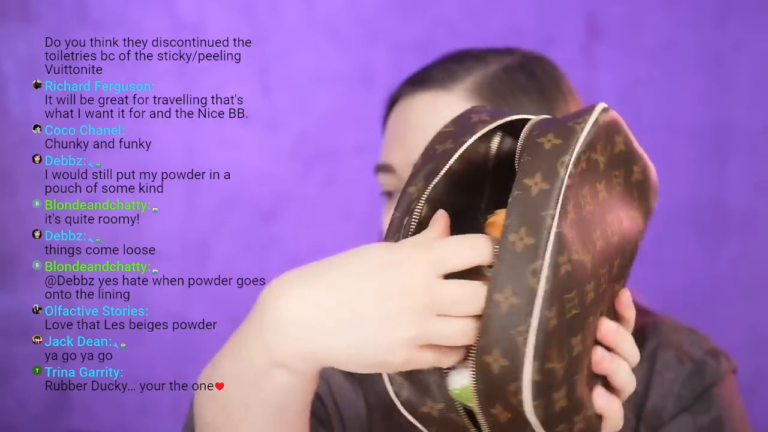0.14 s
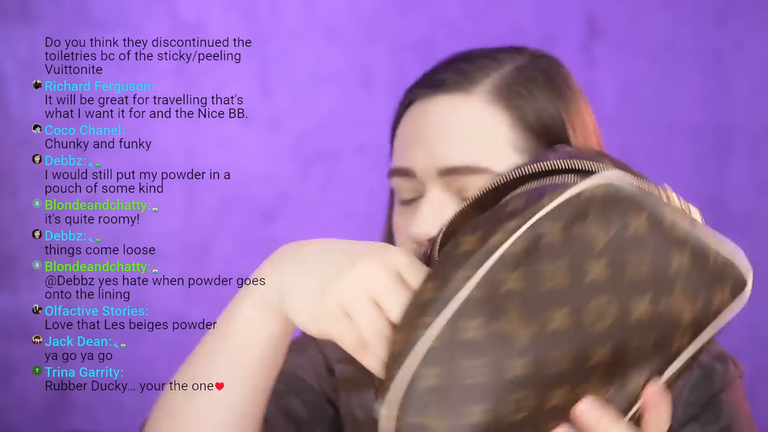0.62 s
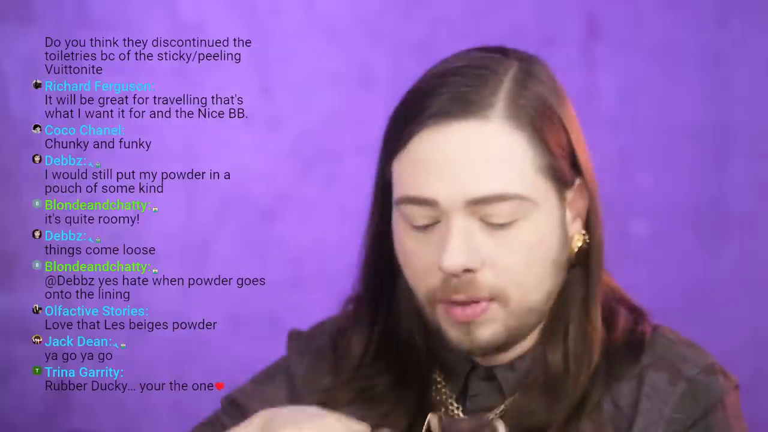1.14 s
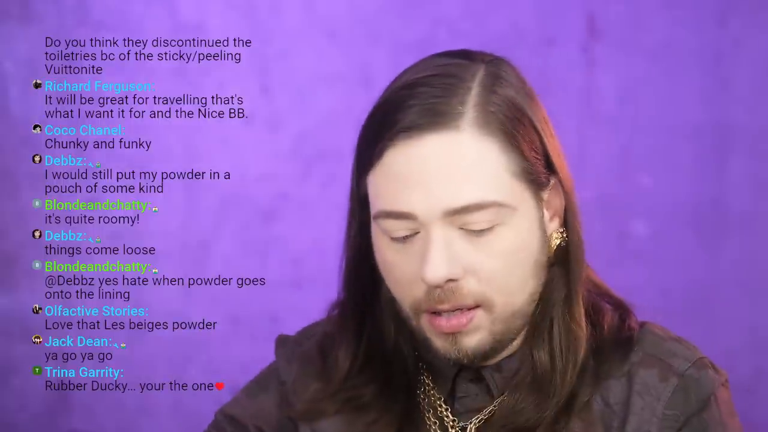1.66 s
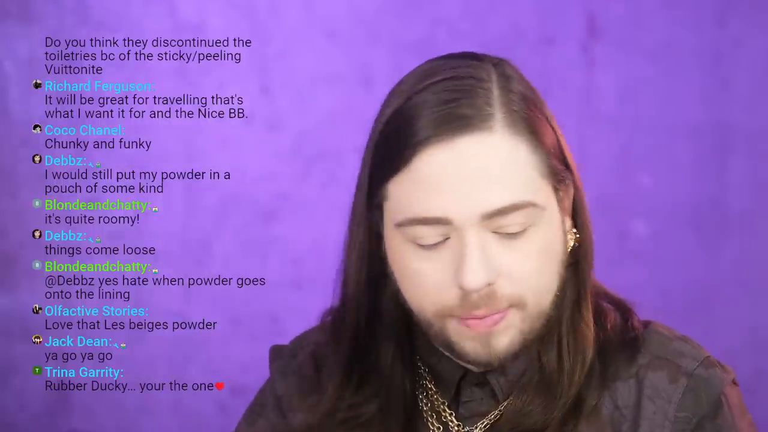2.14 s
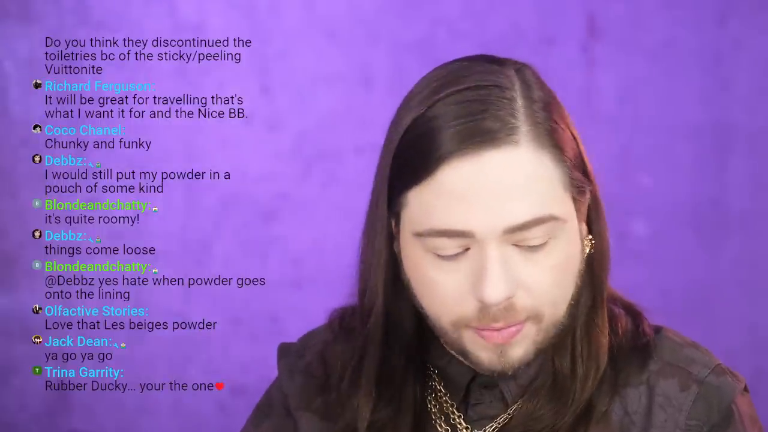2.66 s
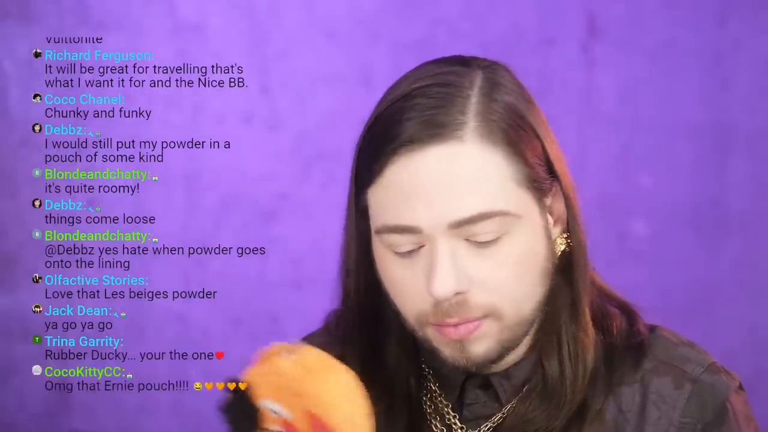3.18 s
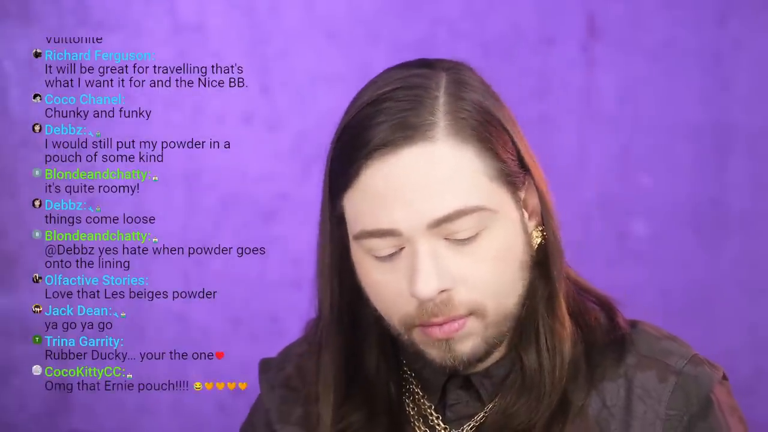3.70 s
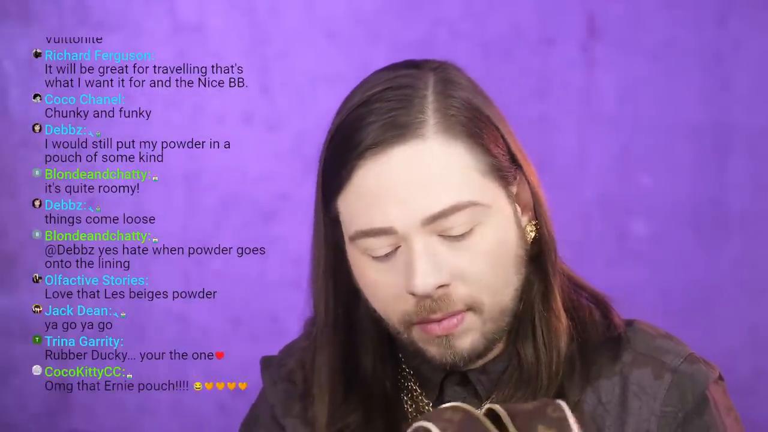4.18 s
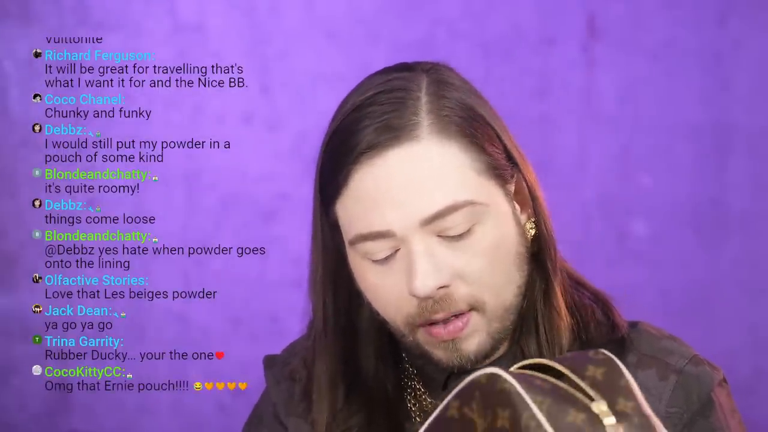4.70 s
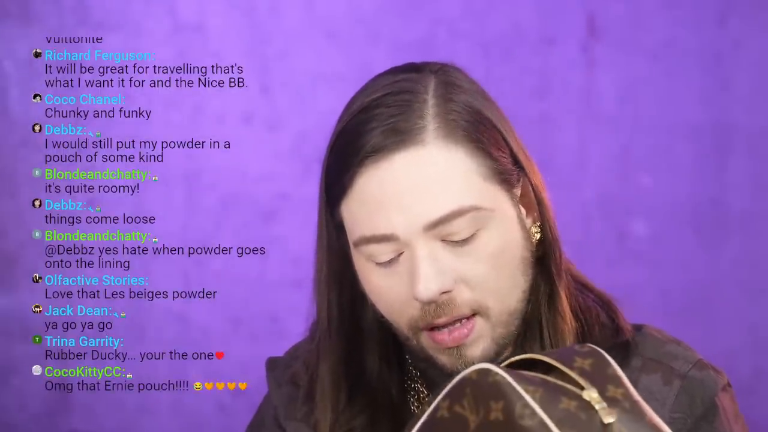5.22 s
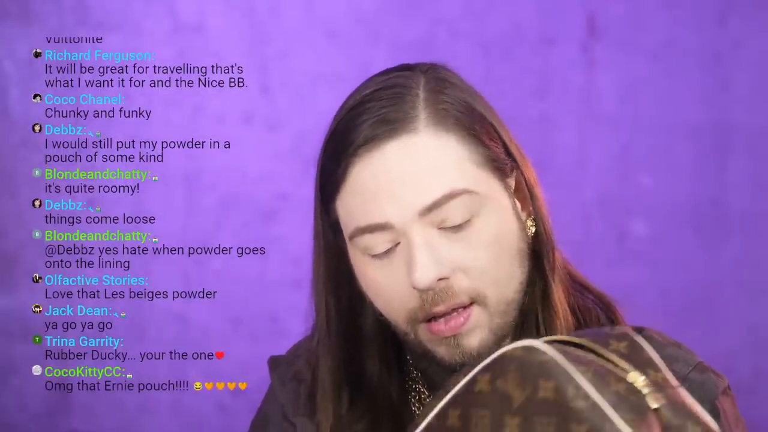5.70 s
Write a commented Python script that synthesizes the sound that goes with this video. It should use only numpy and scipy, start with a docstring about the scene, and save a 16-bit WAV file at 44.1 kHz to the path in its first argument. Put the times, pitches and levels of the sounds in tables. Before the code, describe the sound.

Small things shift in a coated canvas pouch with sharp crinkly snaps, then a soft knock on a table and lighter rustling over low hum.

```python
"""Mains hum and hiss lie under the whole scene, summed from harmonics and filtered noise; they sink around 2 s.
From the start a hand moves small things in a coated canvas pouch: grains of noise make crinkle and cloth rub,
lumpy low noise the rumble of the contents. From 0.13 s creases snap and thump as damped sines with noise
bursts, densest before 2 s. Near 3.8 s one thing is set down on a table with a soft modal knock, then a thin
filtered-noise hiss as of sliding; handling returns from 4.1 to 4.8 s and from 5.4 s."""
import sys
import numpy as np
from scipy import signal
from scipy.fft import rfft, irfft, next_fast_len
from scipy.io import wavfile
from scipy.ndimage import map_coordinates

SR = 44100
rng = np.random.default_rng(int(sys.argv[2]) if len(sys.argv) > 2 else 0)


def log_audio(samples):
    """Write samples as a 16-bit WAV file to the path given in sys.argv[1]."""
    # one column per channel
    frames = np.atleast_2d(samples).T
    # limit to full scale, then quantise
    limited = np.clip(frames, -1, 1)
    pcm = np.round(limited * 32767).astype(np.int16)
    wavfile.write(sys.argv[1], SR, pcm)


def attenuation_scalar(level_db):
    """Turn a level in dB into a linear amplitude multiplier (20 dB per decade)."""
    decades = np.asarray(level_db, float) / 20
    return 10 ** decades


N = 257229

# Level of hum and hiss together: time_s, level_db
BACKGROUND_LEVEL = [(0.0, -51), (.6, -50.5), (1.8, -52.5), (2.5, -57.5), (3.3, -56.5), (5.83, -56.5)]
# Harmonics of the mains: multiple (of MAINS_HZ), relative_level_db
HUM_HARMONICS = [(1, 0), (2, -23), (3, -18.5), (5, -26)]
MAINS_HZ = 50
# Spectrum of the steady hiss: frequency_hz, relative_level_db
HISS_SPECTRUM = [(20, 11.5), (50, 0.5), (80, 2), (150, -7.5), (300, -9.5), (600, -14.5), (1200, -16.5),
                 (2500, -20.5), (5000, -22), (9000, -27.5), (15800, -27.5), (16300, -53)]

# Slow movement of the pouch: time_s, crinkle_level_db, rub_level_db
SLOW_MOVEMENT = [(0, -71.5, -69.5), (.3, -63, -63.5), (.42, -71, -67), (.62, -64, -63.5), (1.1, -64.5, -63),
                 (1.75, -67.5, -62.5), (1.88, -70, -70.5), (2.2, -71.5, -67.5), (2.6, -76, -70),
                 (3.15, -77, -74), (3.7, -74.5, -73.5), (3.95, -81, -79.5), (4.15, -70.5, -73),
                 (4.45, -69.5, -67.5), (4.68, -74, -73), (4.8, -72, -72), (4.9, -83.5, -79),
                 (5.36, -92.5, -80), (5.45, -72, -64.5), (5.6, -73.5, -72), (5.73, -77, -77.5),
                 (5.83, -67, -66)]
SLOW_FIZZ_DB = -13  # fizz of the slow movement, relative to its crinkle
# The hand presses the pouch: start_s, hold_s (from the start), crinkle_level_db, rub_level_db, fizz_level_db
SQUEEZES = [(0.121, 0.038, -62.5, -61.5, -68), (0.214, 0.043, -54, -54.5, -65),
            (0.329, 0.018, -57.5, -65, -69.5), (0.491, 0.032, -59, -66.5, -74),
            (1.145, 0.03, -40.5, -55, -55), (1.191, 0.061, -55, -58.5, -66),
            (1.278, 0.024, -59.5, -58.5, -76.5), (1.371, 0.051, -52.5, -53.5, -67),
            (1.445, 0.02, -58.5, -55.5, -60), (1.521, 0.03, -60, -55, -71),
            (1.58, 0.064, -59.5, -68.5, -77), (1.693, 0.045, -55.5, -56.5, -68),
            (2.018, 0.059, -67, -73.5, -79), (2.303, 0.035, -67, -63.5, -83.5),
            (2.442, 0.057, -78.5, -69, -82), (2.779, 0.034, -71.5, -64.5, -95.5),
            (2.995, 0.065, -73.5, -72, -85), (3.614, 0.12, -74, -77, -81), (3.756, .025, -68, -63, -80),
            (3.79, 0.033, -54, -50, -70), (4.132, 0.031, -57, -63.5, -68.5),
            (4.217, 0.093, -63.5, -67, -75), (4.284, 0.027, -59, -56, -75), (4.326, 0.089, -58.5, -58, -66),
            (4.506, .09, -65.5, -66.5, -72), (4.683, 0.063, -64, -63, -68.5), (5.443, .05, -65.5, -68, -74),
            (5.491, 0.079, -64.5, -69, -78.5), (5.603, 0.078, -64, -61, -71)]
ATTACK_S, RELEASE_T60_S = 0.0047, 0.12  # rise and dying away of a squeeze
# Spectrum of the coating's crinkle: frequency_hz, relative_level_db
COATING_SPECTRUM = [(1500, -21.5), (2500, -6.5), (3300, -5.5), (4300, -3.5), (5400, 0), (6400, -2.5),
                    (7500, -10.5), (9500, -34)]
# Spectrum of the coating's fine fizz: frequency_hz, relative_level_db
FIZZ_SPECTRUM = [(6000, -31.5), (8000, 0), (10500, 3), (13000, -7.5), (15800, -21), (16300, -37)]
# Spectrum of cloth rubbing on cloth: frequency_hz, relative_level_db
CLOTH_SPECTRUM = [(120, -20.5), (280, -7.5), (500, -1), (1000, -0.5), (2000, -4.5), (3500, -15.5),
                  (8000, -41)]

# Low rumble of things shifting inside: time_s, level_db
RUMBLE_LEVEL = [(0, -79), (.5, -74), (.65, -64), (.8, -67), (1.0, -72), (1.45, -68), (1.8, -76.5),
                (2.45, -71), (2.7, -73.5), (2.85, -70), (3.06, -69), (3.15, -84), (5.57, -90), (5.61, -63),
                (5.67, -62.5), (5.71, -84)]
# Spectrum of the rumble: frequency_hz, relative_level_db
RUMBLE_SPECTRUM = [(120, -25.5), (220, -7), (350, -1), (520, -7), (900, -26.5)]

# The coating cracks: start_s, level_db, pitch_hz
SNAPS = [(.1289, -39, 3850), (.14, -26, 6030), (.149, -36, 3520), (0.1955, -22.5, 6200), (.2, -29.5, 3070),
         (0.2206, -20, 5260), (0.23, -23, 4470), (0.2363, -26, 5390), (.249, -21.5, 5500),
         (.2534, -27, 4570), (0.2797, -31, 4810), (0.2959, -17, 4860), (0.3369, -23, 4410),
         (0.4166, -39, 4560), (0.4682, -38.5, 5440), (0.5077, -27, 4330), (0.5121, -29.5, 3780),
         (0.689, -41, 6930), (1.086, -40.5, 12440), (1.1147, -29.5, 4360), (1.1508, -19, 5260),
         (1.1533, -14, 6250), (1.1533, -26, 4500), (1.159, -16, 5500), (1.162, -32, 5550),
         (1.1758, -25, 4415), (1.183, -14.5, 4360), (1.2492, -27, 6430), (1.282, -40, 4460),
         (1.3453, -41, 4360), (1.3877, -33.5, 2906), (1.3957, -31.5, 6330), (1.405, -32.5, 6230),
         (1.4174, -35, 6160), (1.421, -31, 6490), (1.462, -35.5, 4030), (1.474, -36.5, 6240),
         (1.502, -39, 4620), (1.58, -35.5, 6400), (1.608, -38.5, 5680), (1.6483, -43, 2517),
         (1.6511, -33, 6500), (1.704, -38, 6630), (1.7217, -35, 4940), (1.8118, -42, 4960),
         (1.9074, -40.5, 4640), (2.4194, -47.5, 3780), (2.4947, -48, 3760), (2.631, -46.5, 5830),
         (2.692, -48, 3710), (3.2438, -33.5, 5400), (3.6546, -36, 11200), (3.655, -48.5, 2440),
         (3.6786, -45.5, 4190), (3.6879, -31.5, 3910), (3.7715, -42, 11900), (3.7956, -36, 4520),
         (3.8304, -37.5, 5150), (4.1354, -36.5, 2650), (4.1483, -36, 5710), (4.156, -40.5, 5500),
         (4.222, -39.5, 5320), (4.242, -40, 5740), (4.2554, -48, 2820), (4.2682, -43, 2550),
         (4.2937, -33.5, 2640), (4.3446, -39, 5940), (4.3627, -43.5, 5560), (4.3948, -34, 6100),
         (4.4246, -44.5, 2780), (4.5807, -38, 6320), (4.615, -39, 7100), (4.71, -38, 6240),
         (5.46, -48, 5030), (5.497, -40, 5370), (5.509, -39, 2400), (5.5177, -39.5, 4110),
         (5.528, -44.5, 3950), (5.555, -50.5, 3300), (5.606, -42, 6140), (5.633, -43, 2300)]
# The pouch wall gives: start_s, level_db, pitch_hz
THUMPS = [(0.1292, -37, 1707), (0.181, -40.5, 1636), (.2, -35, 1220), (0.2198, -42, 586),
          (0.2263, -31.5, 1170), (.2372, -42, 875), (.2534, -26, 2006), (0.6208, -50, 318),
          (1.07, -42, 1039), (1.1246, -43, 1035), (1.182, -19, 2135), (1.189, -32, 660), (1.293, -37, 1120),
          (1.3211, -39, 941), (1.345, -43.5, 736), (1.3873, -32, 1020), (1.4172, -46.5, 575),
          (1.44, -42, 540), (1.4613, -40, 2040), (1.5076, -37.5, 870), (1.531, -37.5, 2000),
          (1.5449, -36, 1844), (1.5887, -40.5, 1520), (1.6298, -42.5, 990), (1.6482, -44, 640),
          (1.6894, -41, 986), (1.7492, -42.5, 747), (1.8106, -43.5, 942), (1.8176, -39.5, 1190),
          (2.037, -40, 1253), (2.312, -40, 1820), (2.476, -51.5, 236.5), (2.4943, -48, 1110),
          (2.5203, -45.5, 607), (2.653, -47, 485), (2.663, -49, 382), (2.7904, -45, 1392),
          (2.803, -47, 397), (2.885, -55.5, 287.4), (3.0568, -40.5, 1070), (3.2434, -49.5, 730),
          (3.244, -42, 1905), (3.572, -49.5, 1212), (3.627, -50, 1110), (3.6888, -43.5, 880),
          (3.701, -51, 1200), (3.731, -53.5, 1300), (3.7957, -33, 720), (3.797, -39.5, 2300),
          (3.8288, -43, 1870), (4.1355, -37.5, 1020), (4.156, -33.5, 1387), (4.195, -48.5, 907),
          (4.222, -48.5, 972), (4.2823, -42.5, 1150), (4.2938, -29, 1558), (4.336, -50, 980),
          (4.372, -46, 770), (4.3881, -35, 870), (4.51, -49.5, 909), (4.529, -47, 999),
          (4.5633, -42.5, 708), (4.5783, -44.5, 740), (4.604, -48.5, 735), (4.6275, -46.5, 2000),
          (4.6492, -41.5, 1600), (4.6949, -48, 480), (4.7096, -43.5, 1100), (4.7472, -49, 890),
          (4.77, -49.5, 700), (5.442, -50, 897), (5.487, -49, 750), (5.496, -48, 970), (5.51, -38, 939),
          (5.5184, -43, 1140), (5.551, -47.5, 1090), (5.608, -45, 700), (5.621, -54, 514),
          (5.646, -54, 480), (5.661, -43, 582), (5.6681, -39, 552)]
# Noise spectrum of a crack: multiple (of the ringing pitch), relative_level_db
CRACK_SPECTRUM = [(.2, -20), (.5, -2.5), (1, 3), (1.6, -2.5), (2.5, -10), (5, -26.5)]
# Chance creases: snap level over the crinkle, thump level over the rub, scale of the exponential scatter
SMALL_SNAP_DB, SMALL_THUMP_DB, SCATTER_DB = 11, 6.5, 3.5
SMALL_SNAP_HZ, SMALL_THUMP_HZ = (2300, 6300), (474, 2000)  # their pitch ranges
CROWDING = 0.5  # chance creases come oftener as this power of the handling amplitude

# Contacts with the table: start_s, level_db
KNOCKS = [(3.755, -48), (3.774, -48), (3.797, -31), (3.8105, -36), (3.825, -43)]
# Modes of the table top: frequency_hz, mean_relative_level_db, t60_s
TABLE_MODES = [(113, -8.5, 0.22), (233, -7, 0.11), (270, 7.5, 0.0807), (329, 1, 0.064), (440, -2.5, 0.045),
               (640, -8.5, 0.072)]
# Level of the sliding hiss: time_s, level_db
SLIDE_LEVEL = [(3.82, -100), (3.86, -77), (4.1, -71), (4.16, -100)]
# Spectrum of the sliding hiss: frequency_hz, relative_level_db
SLIDE_SPECTRUM = [(3500, -41), (4400, -2), (4900, 4), (5400, -7), (6500, -36)]

# Reverberation time of the room: frequency_hz, t60_s
ROOM_T60 = [(300, 0.17), (2000, 0.053), (5000, 0.078), (12000, 0.016)]
# Frequency response of the microphone: frequency_hz, gain_db
MICROPHONE_RESPONSE = [(9000, -1), (14500, -1.5), (15600, -15), (16300, -37)]


def unit(x):
    """Normalization: the signal divided by its root mean square."""
    return x / np.sqrt(np.mean(x ** 2) + 1e-20)


def along(points, hz):
    """Linear interpolation of tabulated values on a logarithmic frequency axis."""
    frequency, value = np.transpose(points)
    return np.interp(np.log(hz + 1), np.log(frequency + 1), value)


def curves(rows):
    """Linear interpolation in time: one value per sample for each column after the first."""
    time_s, *columns = np.transpose(rows)
    return [np.interp(np.arange(N) / SR, time_s, column) for column in columns]


def wobble(rate):
    """Slow random modulation: a spline through normal deviates, rate knots a second."""
    knots = rng.standard_normal(int(N * rate / SR) + 4)
    return map_coordinates(knots, [np.arange(N) * rate / SR])


def coloured(x, spectrum):
    """Minimum-phase filtering: folding the cepstrum makes a causal filter of the given magnitude."""
    size = 2 * next_fast_len(len(x) // 2 + 4096)
    magnitude = attenuation_scalar(along(spectrum, np.fft.rfftfreq(size, 1 / SR)))
    cepstrum = irfft(np.log(magnitude), size)
    cepstrum[1:size // 2] *= 2
    cepstrum[size // 2 + 1:] = 0
    response = np.exp(rfft(cepstrum))
    return irfft(rfft(x, size) * response, size)[:len(x)]


def ring(t, hz, t60, attack):
    """Damped resonance: a sine decays exponentially after a soft onset."""
    return np.sin(2 * np.pi * hz * t) * attenuation_scalar(-60 * t / t60) * (1 - np.exp(-t / attack))


def grains(rate, spread_db, life, clump_db, bed_db):
    """Granular friction: brief noise bursts of scattered size come in clumps over even noise."""
    size = np.minimum(rng.exponential(1, N), 2.5)
    starts = (rng.random(N) < rate / SR) * attenuation_scalar(spread_db * size)
    envelope = signal.lfilter([1], [1, -np.exp(-1 / (life * SR))], starts)  # life: time constant in s
    bursts = envelope * rng.standard_normal(N)
    clumped = unit(bursts * attenuation_scalar(clump_db * wobble(40)))
    return clumped + attenuation_scalar(bed_db) * rng.standard_normal(N)


def background():
    """Additive synthesis: phase-locked mains harmonics, and a hiss that shares their level curve."""
    phase = 2 * np.pi * MAINS_HZ * np.arange(N) / SR + 1.19
    hum = 0
    for multiple, db in HUM_HARMONICS:
        level = np.sqrt(2) * attenuation_scalar(db + 0.22 * wobble(24))
        hum = hum + level * np.sin(multiple * phase)
    hiss = attenuation_scalar(-10) * unit(coloured(rng.standard_normal(N), HISS_SPECTRUM))
    return attenuation_scalar(curves(BACKGROUND_LEVEL)[0]) * (hum + hiss)


def handling():
    """Addition of powers: squeezes that rise, hold and decay join slow movement; returns levels in dB."""
    crinkle_db, rub_db = curves(SLOW_MOVEMENT)
    power = attenuation_scalar(2 * np.array([crinkle_db, rub_db, crinkle_db + SLOW_FIZZ_DB]))
    t = np.arange(N) / SR
    for start, hold, *levels_db in SQUEEZES:
        rise = np.clip((t - start) / ATTACK_S, 0, 1)
        release = attenuation_scalar(-60 * np.maximum(t - start - hold, 0) / RELEASE_T60_S)
        power = power + attenuation_scalar(2 * np.array(levels_db))[:, None] * (rise * release) ** 2
    return 10 * np.log10(power)


def rustle(crinkle_db, rub_db, fizz_db):
    """Granular friction: creases crackle and fizz in the coating; cloth scrapes with a lower, softer grain."""
    creases = grains(rate=450, spread_db=2.0, life=0.00037, clump_db=3.0, bed_db=-1)
    scrapes = grains(rate=300, spread_db=4, life=0.00048, clump_db=3.0, bed_db=-0.5)
    crinkle = attenuation_scalar(crinkle_db) * unit(coloured(creases, COATING_SPECTRUM))
    fizz = attenuation_scalar(fizz_db) * unit(coloured(creases, FIZZ_SPECTRUM))
    rub = attenuation_scalar(rub_db) * unit(coloured(scrapes, CLOTH_SPECTRUM))
    return crinkle + fizz + rub


def rumble():
    """Low-frequency impacts: soft things roll and settle against the wall with a lumpy noise."""
    lumps = grains(rate=54, spread_db=5, life=0.0073, clump_db=1.5, bed_db=-2)
    return attenuation_scalar(curves(RUMBLE_LEVEL)[0]) * unit(coloured(lumps, RUMBLE_SPECTRUM))


def crack(t, hz, t60):
    """Impulsive noise: a decaying burst of peak 1, spread widely around a pitch."""
    noise = rng.standard_normal(len(t)) * attenuation_scalar(-60 * t / t60)
    burst = coloured(noise, [(multiple * hz, db) for multiple, db in CRACK_SPECTRUM])
    return burst / np.abs(burst).max()


def small_creases(level_db, range_hz, count):
    """Random point process: strong handling brings more and louder creases (start_s, level_db, pitch_hz)."""
    when, size, pitch = rng.random((count, 3)).T
    odds = np.cumsum(attenuation_scalar(CROWDING * level_db))
    at = np.searchsorted(odds, when * odds[-1])
    crease_db = level_db[at] - SCATTER_DB * np.log(1 - 0.9 * size)
    low, high = range_hz
    return list(zip(at / SR, crease_db, low * (high / low) ** pitch))


def snaps(crinkle_db, rub_db):
    """Sudden release of strain: the coating cracks and rings briefly, the pouch wall thumps more dully."""
    out = np.zeros(N + SR)
    t = np.arange(SR // 30) / SR
    small_snaps = small_creases(crinkle_db + SMALL_SNAP_DB, SMALL_SNAP_HZ, count=120)
    for start, db, hz in SNAPS + small_snaps:
        snap = ring(t, hz, 18 / hz, 0.0001) + 0.6 * crack(t, hz, 0.006)  # 18 periods to fall 60 dB
        out[round(start * SR):][:len(t)] += attenuation_scalar(db) * snap
    small_thumps = small_creases(rub_db + SMALL_THUMP_DB, SMALL_THUMP_HZ, count=120)
    for start, db, hz in THUMPS + small_thumps:
        thump = 1.4 * ring(t, hz, 7 / hz, 0.0003) + 0.5 * crack(t, hz, 0.015)
        out[round(start * SR):][:len(t)] += attenuation_scalar(db) * thump
    return out[:N]


def knock():
    """Modal excitation: a soft thing touches, lands and rocks; the table top answers in low damped modes."""
    out = np.zeros(N)
    t = np.arange(SR // 5) / SR
    for start, db in KNOCKS:
        top = 0
        for hz, mode_db, t60 in TABLE_MODES:
            varied_db = mode_db + rng.normal(0, 2.14)  # each contact excites the modes differently
            top = top + attenuation_scalar(varied_db) * ring(t, hz, t60, 0.0028)
        out[round(start * SR):][:len(t)] += attenuation_scalar(db) * top / np.abs(top).max()
    return out


def slide():
    """Steady friction: a thin, even hiss, as of something smooth being drawn along."""
    return attenuation_scalar(curves(SLIDE_LEVEL)[0]) * unit(coloured(rng.standard_normal(N), SLIDE_SPECTRUM))


def room(x):
    """Reverberation of a small furnished room: decaying noise tails, a new one each quarter second."""
    out = np.zeros(N + SR)
    step = SR // 4
    for k in range(0, N, step):
        hz, t, bins = signal.stft(rng.standard_normal(SR // 3), SR, nperseg=256)
        decay = attenuation_scalar(-60 * t / along(ROOM_T60, hz)[:, None])
        tail = signal.istft(bins * decay, SR, nperseg=256)[1]
        wet = signal.fftconvolve(x[k:k + step], tail / np.linalg.norm(tail))
        out[k + 130:][:len(wet)] += wet  # the tail starts 130 samples (3 ms) late
    return out[:N]


def scene():
    """Superposition: pouch, table and echo pass a microphone that dulls the top, over hum and hiss."""
    crinkle_db, rub_db, fizz_db = handling()
    impacts = snaps(crinkle_db, rub_db) + knock()
    echo = attenuation_scalar(-17) * room(impacts)
    friction = rustle(crinkle_db, rub_db, fizz_db) + rumble() + slide()
    picked_up = coloured(impacts + echo + friction, MICROPHONE_RESPONSE)
    return (picked_up + background())[None]


def band_limit(x):
    """A steep low-pass at the top of the band."""
    return signal.sosfilt(signal.butter(12, 16520, fs=SR, output="sos"), x)


def record(dry):
    """Final stage of the signal chain: the finished mix becomes the output."""
    return band_limit(dry)


dry = scene()
out = record(dry)
log_audio(out)
```